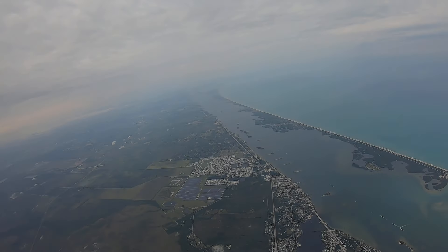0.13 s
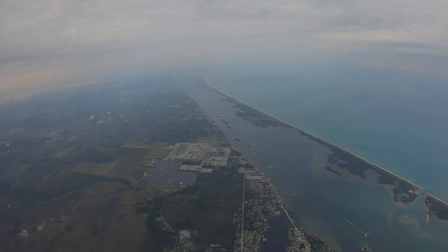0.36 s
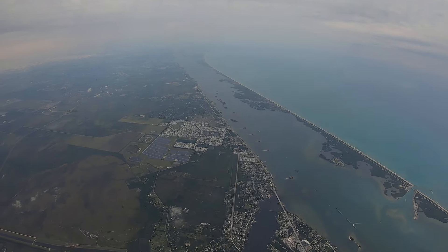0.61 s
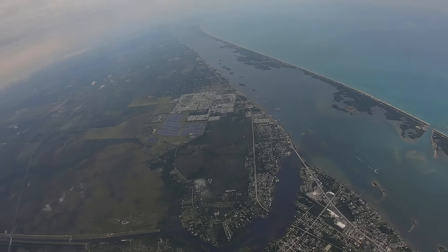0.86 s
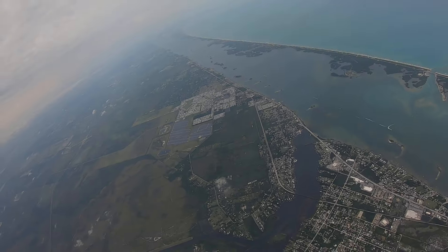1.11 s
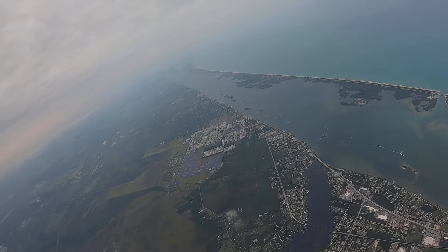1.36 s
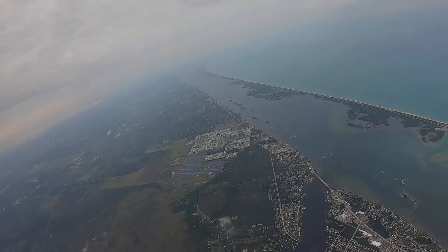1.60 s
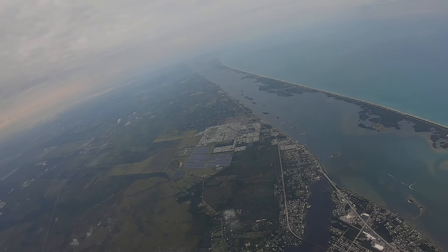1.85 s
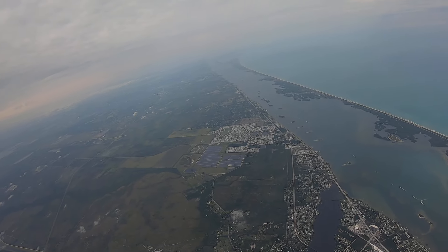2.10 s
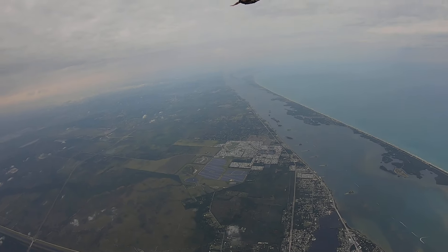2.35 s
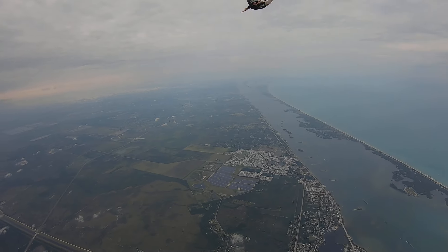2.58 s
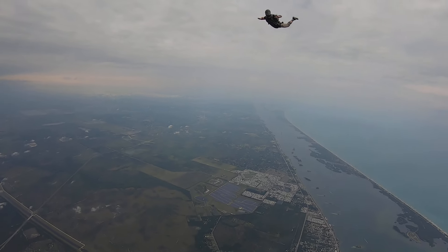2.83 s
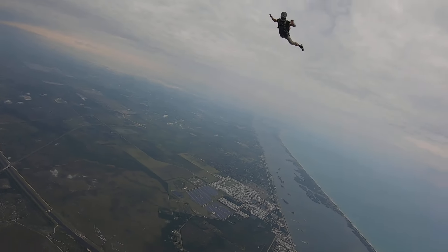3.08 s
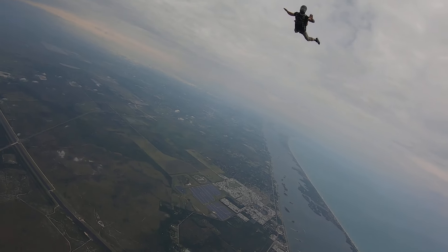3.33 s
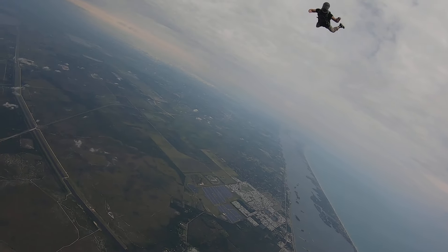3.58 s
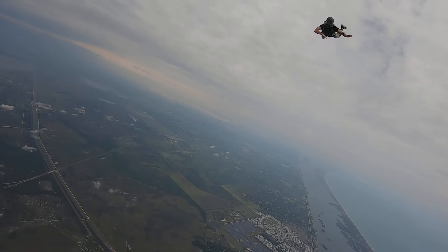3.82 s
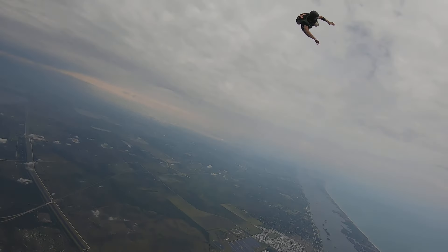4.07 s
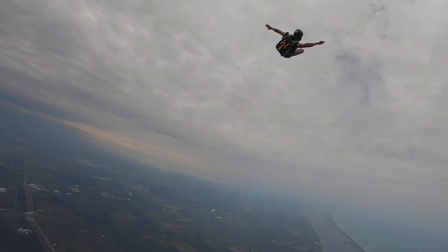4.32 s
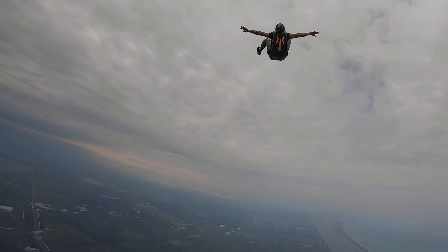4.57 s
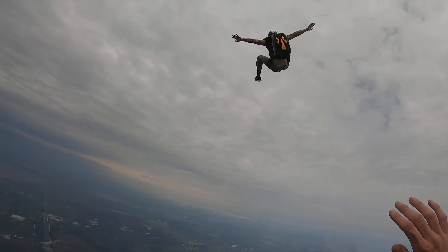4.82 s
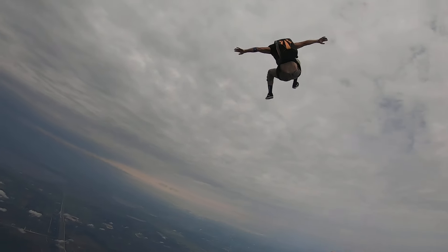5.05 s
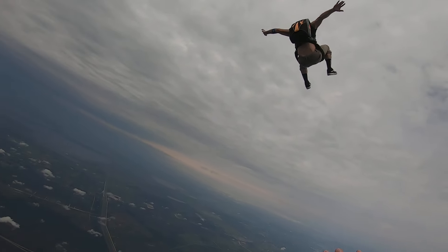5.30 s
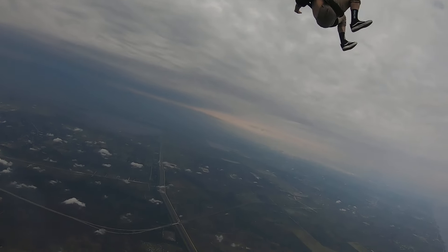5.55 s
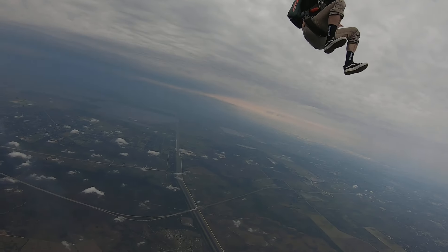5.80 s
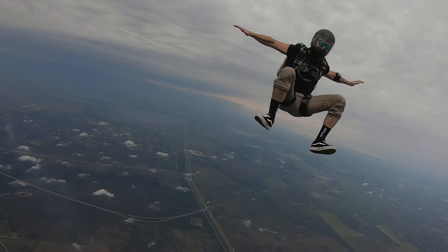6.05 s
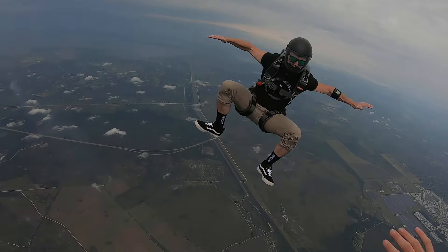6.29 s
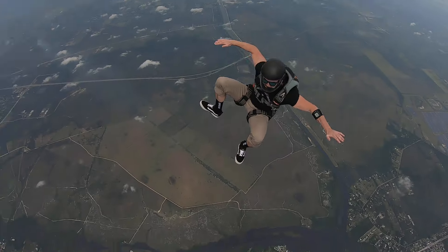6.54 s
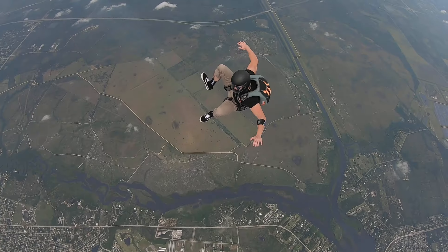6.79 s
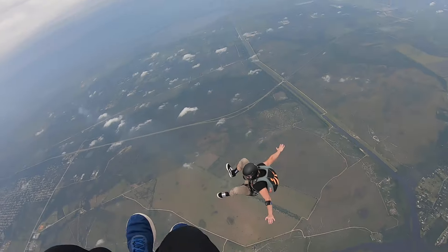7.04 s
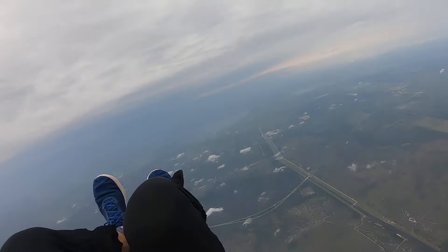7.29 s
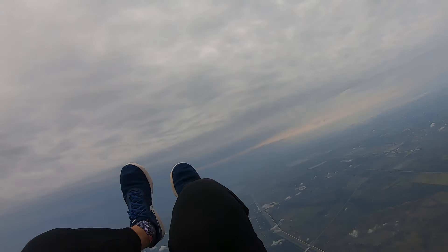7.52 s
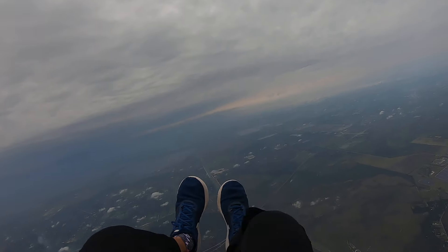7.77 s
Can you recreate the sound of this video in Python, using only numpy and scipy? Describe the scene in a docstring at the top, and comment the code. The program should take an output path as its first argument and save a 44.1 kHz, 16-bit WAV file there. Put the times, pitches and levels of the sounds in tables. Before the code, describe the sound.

Close, overloaded wind noise outdoors during a skydive. Low rumbling and rough mid roar flutter rapidly, with short gusts and sudden dips. An early rush blooms into bright hiss, the middle is patchy and slapping, and hard buffets hit late before another broad rush. Small loose-part ticks click now and then. The microphone is fully in the airflow, its level squeezed and its peaks rounded off.

```python
"""High above the ground, in free fall: air tears past a small microphone.
Turbulence is noise in overlapping bands: big eddies give a lumpy rumble, and small eddies come in patches,
so roar and fizz flare and die together. Strong eddies slap the port, with noise humps and pressure dips.
A smooth hiss blooms when the flow lies flat, and something loose ticks as very short tone pairs that swell
and fade. Gain control holds the level down."""
import sys
import numpy as np
from scipy import signal
from scipy.fft import rfft, irfft, next_fast_len
from scipy.io import wavfile
from scipy.ndimage import uniform_filter1d

SR = 44100
rng = np.random.default_rng(int(sys.argv[2]) if len(sys.argv) > 2 else 0)


def transcribe(signal):
    """Save signal, clipped to [-1, 1], as a 16-bit WAV file at the path in sys.argv[1]."""
    frames = np.atleast_2d(signal).T
    limited = np.clip(frames, -1, 1)
    pcm = np.round(limited * 32767).astype(np.int16)
    wavfile.write(sys.argv[1], SR, pcm)


def boost(x):
    """Linear amplitude factor 10**(x/20) for a level x in decibels (scalar or array-like)."""
    u = np.asarray(x, float) / 20
    return 10 ** u


N = 348208  # samples
STEP = 32  # samples between control values
BANDS = np.geomspace(30, 14000, 14)  # centres of the eddy bands [Hz]


def evened(x):
    """Normalisation: scales each row to an rms of 1 along time."""
    return x / np.sqrt(np.mean(x ** 2, -1, keepdims=True) + 1e-20)


def on_log_axis(hz_points, values, hz):
    """Interpolation: straight lines on a logarithmic frequency axis."""
    return np.interp(np.log(hz + 1), np.log(np.asarray(hz_points) + 1), values)


def wander(count, low_hz, high_hz, slope):
    """Band-limited random modulation: slow noise at control rate, weakened outside low_hz to high_hz."""
    size = next_fast_len(N // STEP + 2)
    hz = np.fft.rfftfreq(size, STEP / SR) + 1e-3
    shape = hz ** -slope / (1 + (low_hz / hz) ** 2) / (1 + (hz / high_hz) ** 2)
    spectrum = rfft(rng.standard_normal((count, size)))
    return evened(irfft(spectrum * shape, size))


# spectrum of the hiss: (frequency [Hz], relative density [dB per Hz])
HISS_COLOUR = [(1500, -8), (4000, -3), (8000, -5.5), (11000, -14.5), (15500, -43.5)]
# smooth air sliding over the housing: (time [s], hiss level [dB])
SLIPSTREAM = [(0, -86), (0.33, -71), (.65, -60.5), (.94, -50), (1.27, -51.5), (2.04, -76), (3.3, -69.5),
              (5.02, -61), (5.81, -58), (5.96, -77), (6.451, -57.5), (6.539, -74), (6.601, -48.5),
              (6.88, -55.5), (7.19, -49.5), (7.41, -65), (7.87, -68)]


def hiss():
    """Boundary-layer noise: fine even noise that blooms when the flow lies smooth on the housing."""
    size = next_fast_len(N)
    colour = boost(on_log_axis(*np.transpose(HISS_COLOUR), np.fft.rfftfreq(size, 1 / SR)))
    noise = evened(irfft(rfft(rng.standard_normal(size)) * colour, size)[:N])
    s, level_db = np.transpose(SLIPSTREAM)
    return noise * boost(np.interp(np.arange(N) / SR, s, level_db))


# dry ticks of something loose: (time [s], level of the lower partial [dB], its pitch [Hz])
TICKS = [(0.287, -32, 4000), (1.8814, -23, 3380), (1.8985, -30, 3100), (3.869, -46, 4500),
         (4.121, -22, 3880), (5.056, -33.5, 5670), (5.261, -38, 5000)]


def ticks():
    """Impact with nearly no ring: a hard small part knocks, two partials that swell and fade in a few cycles."""
    length = 400  # samples
    out, t = np.zeros(N + length), np.arange(length) / SR
    bell = np.exp(-((t - .0009) / .0005) ** 2)
    for s, level_db, hz in TICKS:
        partials = np.sin(2 * np.pi * hz * t) + .6 * np.sin(2 * np.pi * 1.3 * hz * t)
        out[round(s * SR):][:length] += boost(level_db) * partials * bell
    return out[:N]


def spits():
    """Poisson-like bursts: tiny eddies hit the port at chance moments, with sparse sizes, a few large."""
    rate_hz = 70
    chance, size = rng.random(N // STEP + 2), rng.exponential(1, N // STEP + 2)
    return (chance < rate_hz * STEP / SR) * np.minimum(size, 3)


def pushes(bursts):
    """Dynamic pressure: each slap or spit sucks the diaphragm out, a sharp dip that springs back."""
    half_width_ms = 1.1
    slap_push_db, spit_push_db = 6.5, 5  # dip over slap peak and over roar level, before the high-pass
    u = np.arange(-300, 300) / SR / (half_width_ms / 1000)
    dip = np.exp(-2 * abs(u)) * (1 + 2 * abs(u))
    t = np.arange(0, N, STEP) / SR
    drift_s, roar_db = np.transpose(AIRFLOW)[:2]
    spit_depth = boost(np.interp(t, drift_s, roar_db) + spit_push_db)
    train = np.zeros(N)
    train[::STEP] = -bursts[:len(t)] * np.interp(t, *np.transpose(CHOP)) * spit_depth
    for s, peak_db, _ in SLAPS:
        train[round((s + SLAP_DELAY) * SR)] = -boost(peak_db + slap_push_db)
    high_pass = signal.butter(1, 120, "high", fs=SR)
    return signal.lfilter(*high_pass, signal.oaconvolve(train, dip, "same"))


# mean turbulence at the port: (frequency [Hz], relative density [dB per Hz])
COLOUR = [(12, -24), (30, -6), (62, 2.5), (125, 0.5), (160, -6), (215, -8), (300, -13), (500, -20.5),
          (1000, -27), (2000, -35), (3100, -40), (5000, -52.5), (7000, -61.5), (10000, -76), (12500, -85.5),
          (15500, -106)]
# eddy sizes of roar, body, fizz, rumble, heave: (low edge [Hz], high edge [Hz])
SCALES = [(600, 3000), (150, 500), (4000, 10000), (50, 150), (18, 50)]


def eddy_bands():
    """Turbulence spectrum: coloured noise in overlapping bands, and the level of each eddy size in it."""
    size = next_fast_len(N)
    hz = np.fft.rfftfreq(size, 1 / SR)
    colour = boost(on_log_axis(*np.transpose(COLOUR), hz))
    scale_db = []
    for low, high in SCALES:
        inside = (hz > low) & (hz < high)
        scale_db.append(10 * np.log10(2 * np.sum(colour[inside] ** 2) / size))
    spectrum = rfft(rng.standard_normal(size)) * colour
    bands = [irfft(spectrum * on_log_axis(BANDS, row, hz), size)[:N] for row in np.eye(len(BANDS))]
    return np.array(bands), np.array(scale_db)


# patches of small eddies that sweep over the port, before the shares below:
# (time [s], lift [dB], length at half lift [ms], brightness [dB an octave])
GUSTS = [(0.441, 7.5, 57, 3), (0.649, 5.5, 123, 1.5), (1.51, 3.5, 56, 1), (1.677, 4, 18, 3),
         (1.81, 3.5, 24, 0.5), (2.08, 4.5, 59, 0), (2.277, 10.5, 18, 0.5), (2.722, 6, 18, 2.5),
         (3.224, -0.5, 35, 2), (3.43, 10, 100, -1), (3.734, 7.5, 100, -0.5), (3.793, 3, 8.8, 1.5),
         (3.976, 12.5, 22, 0), (4.116, 8, 24, 1), (4.255, 9, 66, 0.3), (4.479, 3.5, 230, 0),
         (4.884, 5.5, 31, -1.2), (5.031, 5, 84, -0.5), (5.523, 2.5, 46, -0.5), (5.644, 4.5, 46, 0),
         (5.899, 6, 28, 1.8), (6.045, 7, 22, -1.5), (6.27, 9.5, 18, 0.5), (6.46, 9, 110, -0.5),
         (6.59, 8.5, 25, 0), (7.652, 3, 43, 0), (7.722, -1, 56, 1.7)]
# the roar drops out briefly, before the shares below and a common factor:
# (time [s], depth [dB], length at half depth [ms], extra depth of the treble [dB an octave])
LULLS = [(0.175, 3, 56, 0.5), (1.578, 3.5, 65, 1.5), (1.946, 5, 38, -0.5), (2.335, 5, 16, 1),
         (2.789, 5.5, 71, -0.9), (2.938, 3.5, 72, -1.4), (3.163, 10, 24, -2), (3.291, 3.5, 27, -3.5),
         (4.55, 5, 58, 0.2), (4.7, 2, 42, 0), (5.401, 4.5, 120, -0.8), (5.86, 11.5, 13, 0.5),
         (5.998, 2.5, 37, 0), (6.077, 8.5, 28, -1.5), (6.171, 2, 43, 0.5), (6.535, 2.5, 30, 4.5),
         (6.86, 6.5, 170, 0), (7.159, 8.5, 23, -0.5), (7.581, 8.5, 20, 0.5), (7.845, 9, 28, -3)]
# how far roar, body, fizz, rumble and heave follow a gust or lull: (share [factor on the dB])
GUST_SHARE = np.array([1.3, 1.01, 1.29, 0.21, .05])


def gusting(t, octave):
    """Intermittent advection: bell-shaped lifts for gusts and dips for lulls, in dB for each eddy size."""
    total = 0
    for sign, table in ((1, GUSTS), (-0.86, LULLS)):
        s, db, ms, bright_db = np.transpose(table)[:, :, None]
        bell = 2. ** -(2000 * (t - s) / np.clip(ms, 5, 400)) ** 2
        total = total + sign * (GUST_SHARE * (db + bright_db * octave)).T @ bell
    return total


# how much each eddy size flickers, before calming and limiting:
# (frequency [Hz], shared flicker [dB], own flicker [dB])
FLICKER = [(60, 2.0, 2), (191, 5, 2.5), (590, 5.5, 3), (2000, 4.5, 5), (5000, 8, 3.5), (9000, 4.5, 4)]
# how broken the flow is: (time [s], share of the flicker [factor])
CHOP = [(0, 1), (.5, .9), (.8, .5), (1.1, 0.32), (1.5, 0.92), (2.2, 0.95), (2.8, 1), (3.4, 0.94),
        (3.75, 0.98), (4.3, 0.7), (4.8, 0.82), (5.3, 0.91), (6.0, 0.95), (6.5, 0.55), (6.65, 0.37),
        (6.88, 0.38), (7.0, .55), (7.3, 0.58), (7.5, 0.69), (7.9, 0.55)]


def flicker(t, bursts, gust_db):
    """Intermittency of small eddies: one flicker for all sizes, one shared only by neighbouring sizes."""
    clump_share, grain_share = 0.63, 0.52
    spit_low_hz, spit_high_hz, spit_octaves, spit_fade_ms = 700, 9000, 1.55, 1.3
    spit_flare = 3.6  # in units of the shared flicker
    tint_db = 1.1  # random tilt per octave, so each puff has its own colour
    steady_db = 10  # a gust or lull of this size calms the flicker to about a third
    flare_db, dip_db = 12.5, 7.5  # limits of rise and fall, before evening
    hz, shared_db, own_db = np.transpose(FLICKER)

    clumps = wander(count=1, low_hz=14.0, high_hz=22.2, slope=0.16)
    grain = wander(count=1, low_hz=70, high_hz=300, slope=0.1)
    shared = (clump_share * clumps + grain_share * grain)[:, :len(t)]
    own = wander(count=len(BANDS), low_hz=6.2, high_hz=140, slope=0.35)
    own = evened(uniform_filter1d(own, size=2, axis=0))[:, :len(t)]

    # each spit covers some octaves round its own centre
    centre = rng.uniform(np.log2(spit_low_hz), np.log2(spit_high_hz), len(t))
    reach = np.exp(-((np.log2(BANDS)[:, None] - centre) / spit_octaves) ** 2)
    fade = np.exp(-STEP / SR / (spit_fade_ms / 1000))
    shared = shared + spit_flare * signal.lfilter([1], [1, -fade], bursts * reach)

    swing_db = on_log_axis(hz, shared_db, BANDS)[:, None] * shared
    swing_db = swing_db + on_log_axis(hz, own_db, BANDS)[:, None] * own
    tint = wander(count=1, low_hz=7.2, high_hz=40, slope=0.27)[:, :len(t)]
    swing_db = swing_db + tint_db * np.log2(np.maximum(BANDS, 250) / 1500)[:, None] * tint

    broken = np.clip(np.interp(t, *np.transpose(CHOP)), 0, 2)
    calmed = broken * np.exp(-abs(gust_db) / steady_db)
    limit_db = np.where(swing_db > 0, flare_db, dip_db)
    return evened(boost(limit_db * np.tanh(swing_db * calmed / limit_db)))


SLAP_MS = 4.98  # slap length at 1800 Hz
SLAP_DELAY = SLAP_MS / 2500  # from table time to peak [s]: 0.4 of the length
# strong eddies that slap the port: (time [s], peak at 1800 Hz [dB], brightness [dB an octave])
SLAPS = [(0.044, -15.5, -2), (0.413, -24, -2), (0.607, -18, -2), (0.909, -20, 2.5), (0.948, -20, 5.5),
         (1.013, -16.5, 5.5), (1.094, -13, -0.5), (1.232, -25, 2.5), (1.406, -26, 3.5), (1.632, -23.5, 3.5),
         (1.612, -24, 2), (1.673, -16, 0.5), (1.711, -21.5, 2.5), (1.766, -23, 2.5), (1.923, -16, -3),
         (2.037, -27.5, 4), (2.162, -14.5, -3), (2.213, -16, -3.5), (2.252, -22, -1), (2.431, -20, 1.5),
         (2.579, -22.5, 2.5), (2.704, -31, 6), (3.384, -31, 6.5), (3.418, -14, -2.5), (3.455, -22, 4),
         (3.609, -31.5, -0.5), (3.721, -12.5, 2), (3.973, -14, 0.5), (4.025, -18, -0.5),
         (4.098, -15.5, -1.5), (4.207, -13, -1), (4.251, -16, 5), (4.293, -17, -0.5), (4.472, -20.5, 1.5),
         (4.502, -20, -0.5), (4.611, -18, 0), (4.659, -21.5, -0.5), (4.735, -20.5, -1), (4.775, -20, -1.5),
         (4.939, -20, -3), (4.988, -26, 1.5), (5.283, -37, 9.5), (5.31, -15, -1.5), (5.347, -18.5, -0.5),
         (5.511, -17, -2), (5.623, -13, 1.5), (5.734, -20.5, -2), (5.883, -13, -1.5), (5.948, -17.5, 1),
         (6.025, -33, 7), (6.095, -15.5, -1), (6.161, -28.5, 3.5), (6.233, -18, 0), (6.253, -10, -1.2),
         (6.319, -10.5, -1.5), (6.405, -14, -0.5), (6.452, -7, 0), (6.92, -36, 5), (7.034, -13, 0.5),
         (7.134, -19, 3), (7.271, -13, 1.5), (7.304, -10.5, 2), (7.343, -11, 2.2), (7.374, -20.5, -0.5),
         (7.392, -16, -2.5), (7.425, -30, -2.5), (7.513, -28, -0.5), (7.537, -36, 1), (7.559, -33, -3),
         (7.64, -17.5, -0.5), (7.678, -27, -1), (7.709, -25.5, -1.5), (7.746, -24, 1), (7.818, -30, -1.5),
         (7.858, -31, -1.5), (7.873, -18.5, -0.5)]


def slap_power(t):
    """Transient energy: in each band a short hump that falls slower than it rises, weak in the bass."""
    rise, fall = .18, 0.73  # shares of the slap length
    shortening = 0.18  # length goes as frequency to minus this power
    s, peak_db, bright_db = np.transpose(SLAPS)[:, :, None]
    octave = np.log2(BANDS / 1800)
    power = boost(peak_db + bright_db * octave) ** 2 / (1 + (260 / BANDS) ** 2)
    lengths = SLAP_MS / 1000 * 2. ** (-shortening * octave)
    out = []
    for band, length in enumerate(lengths):
        u = (t - s - SLAP_DELAY) / length
        out.append(power[:, band] @ np.exp(-(u / np.where(u < 0, rise, fall)) ** 2))
    return np.array(out)


# smaller eddies, slow drift before gusts: (time [s], roar [dB], body [dB], fizz [dB])
AIRFLOW = [(0.0, -26.5, -11, -43), (0.25, -33, -17, -56.5), (0.6, -34, -12, -58), (0.8, -21.5, -4, -44),
           (1.0, -17.5, -10, -39), (1.3, -28.5, -8.5, -53), (1.7, -26, -7, -51.5), (2.1, -32, -15, -54),
           (2.6, -29.5, -16.5, -52), (3.0, -30.5, -19, -53.5), (3.6, -35.5, -23, -53.5),
           (4.3, -29.5, -17, -51), (4.8, -29, -22.5, -54), (5.5, -26, -14, -48.5), (6.3, -27.5, -17, -48.5),
           (6.75, -28.5, -18, -46.5), (7.05, -18, -5.5, -42.5), (7.35, -28, -16.5, -50),
           (7.5, -40, -24, -65.5), (7.9, -34.5, -16, -61)]
# the largest eddies, before gusts: (time [s], rumble [dB], heave [dB])
RUMBLE = [(0.0, -12.5, -39), (0.9, -11.5, -26), (1.8, -16.5, -25), (2.799, -15, -22.5),
          (3.97, -14.5, -22.5), (4.75, -16, -23.5), (5.3, -11, -26.5), (5.599, -17, -23.5),
          (6.5, -16.5, -20), (6.8, -15.5, -39), (7.36, -10, -15.5), (7.451, -21.5, -21.5),
          (7.871, -11, -28.5)]


def wind(bursts):
    """Superposed turbulence: bands follow the eddy sizes next to them, flicker, and add the slaps in power."""
    t = np.arange(N // STEP + 2) * STEP / SR
    bands, scale_db = eddy_bands()
    level_db = []  # same order as SCALES
    for table in (AIRFLOW, RUMBLE):
        s, *levels = np.transpose(table)
        level_db += [np.interp(t, s, level) for level in levels]
    centres = np.sqrt(np.prod(SCALES, 1))
    gust_db = gusting(t, np.log2(centres / centres[0]))
    lift_db = np.array(level_db) - scale_db[:, None] + gust_db

    rising = np.argsort(centres)
    weights = [on_log_axis(centres[rising], row[rising], BANDS) for row in np.eye(len(SCALES))]
    flow = boost(np.array(weights).T @ lift_db) * flicker(t, bursts, gust_db[0])
    power = flow ** 2 + slap_power(t) / boost(scale_db[0]) ** 2
    now = np.arange(N) / SR
    return sum(band * np.interp(now, t, np.sqrt(p)) for band, p in zip(bands, power))


def scene():
    """Linear superposition: wind, slaps, hiss and ticks add at the one port."""
    fade_in_ms = 2
    bursts = spits()
    fade_in = np.minimum(np.arange(N) / SR / (fade_in_ms / 1000), 1)
    mix = wind(bursts) + pushes(bursts) + hiss() + ticks()
    return (fade_in * mix)[None]


def band_limit(x):
    """A steep low-pass at the top of the band."""
    return signal.sosfilt(signal.butter(12, 15700, fs=SR, output="sos"), x)


def record(dry):
    """Dynamic compression: quick gain control evens out the lumps, then saturation rounds off peaks."""
    split_hz, treble_hold = 202, 0.66  # above the split only this share of the varying cut applies
    power = uniform_filter1d(uniform_filter1d(dry ** 2, size=500), size=500)
    power_db = 10 * np.log10(abs(power) + 1e-9)
    over_db = np.logaddexp(0, power_db + 12)  # soft knee
    cut_db = 0.74 * over_db - 0.49
    bass = signal.filtfilt(*signal.butter(2, split_hz, fs=SR), dry)
    held = bass / boost(cut_db) + (dry - bass) / boost(treble_hold * cut_db + 2.5)
    rounded = np.tanh(held / 1.25) * 1.25
    return band_limit(rounded)


dry = scene()
out = record(dry)
transcribe(out)
```